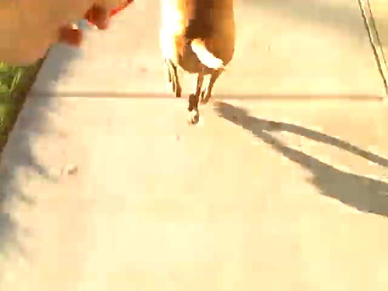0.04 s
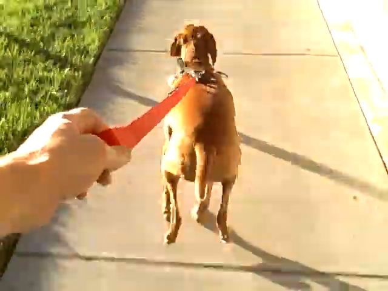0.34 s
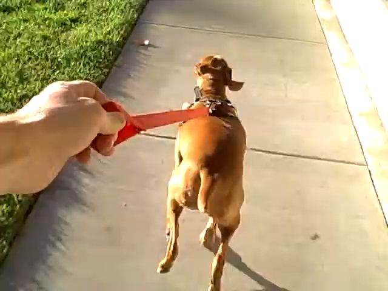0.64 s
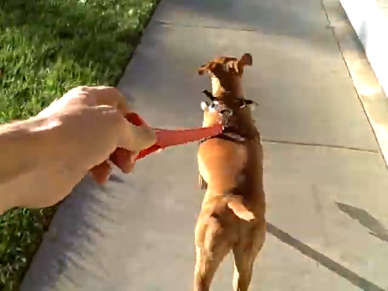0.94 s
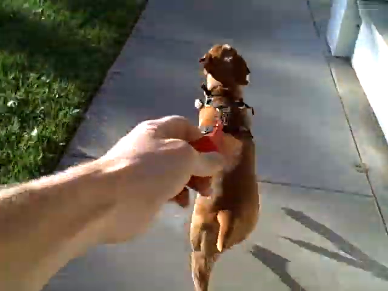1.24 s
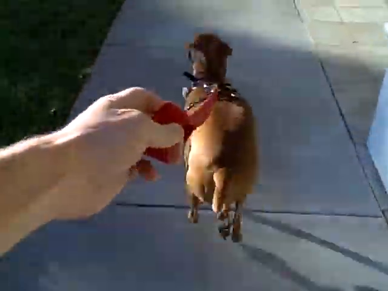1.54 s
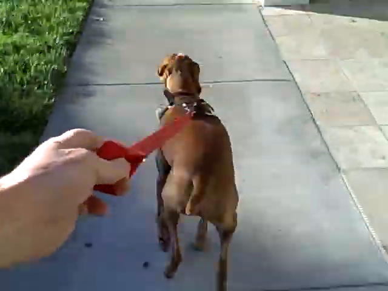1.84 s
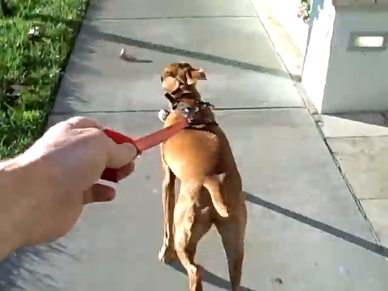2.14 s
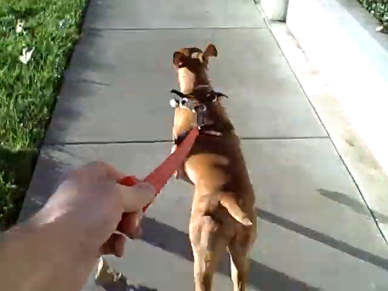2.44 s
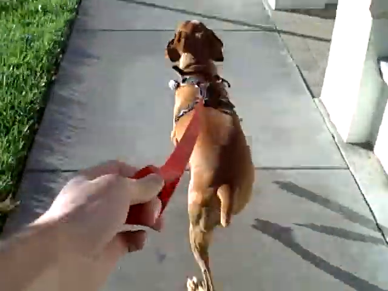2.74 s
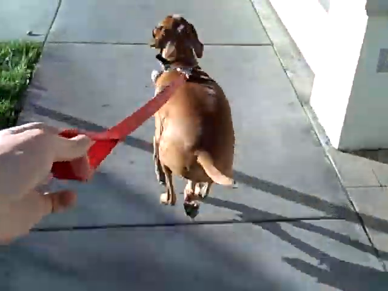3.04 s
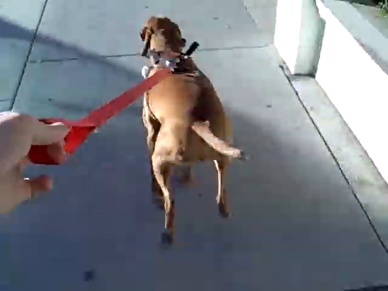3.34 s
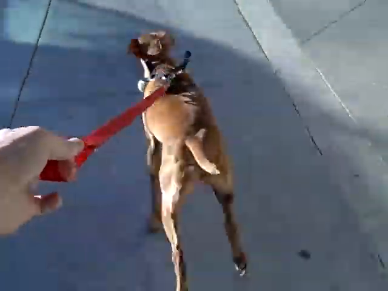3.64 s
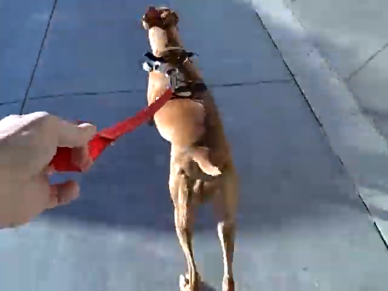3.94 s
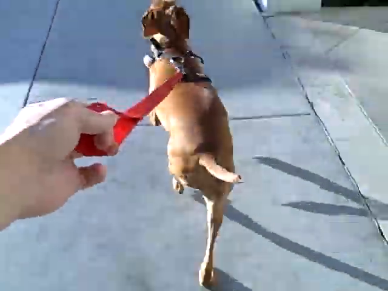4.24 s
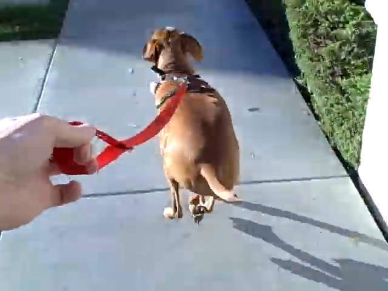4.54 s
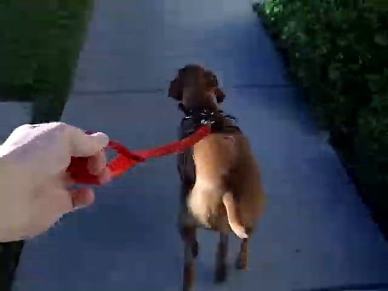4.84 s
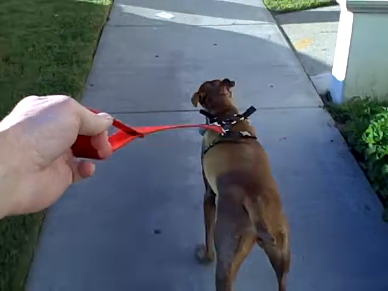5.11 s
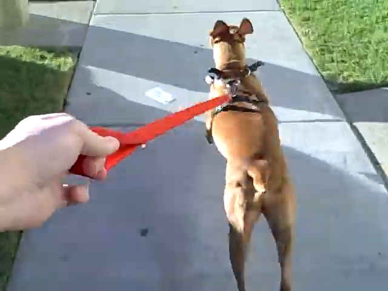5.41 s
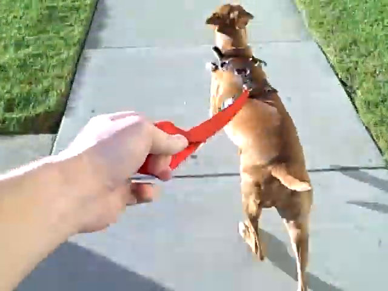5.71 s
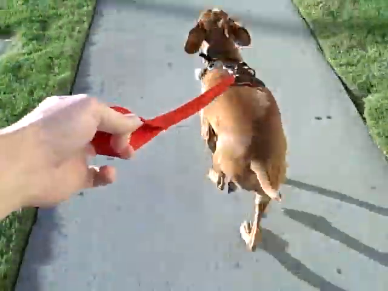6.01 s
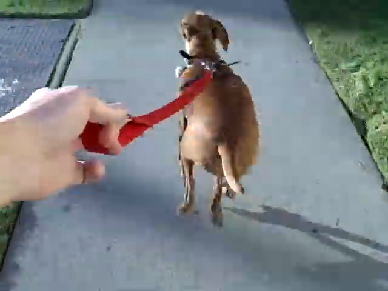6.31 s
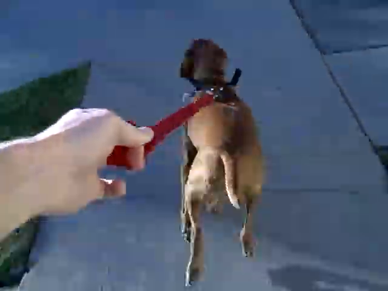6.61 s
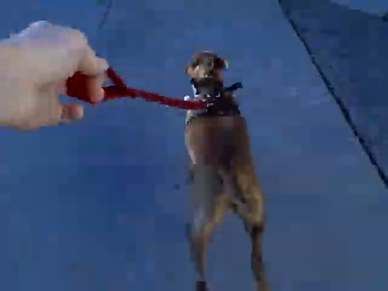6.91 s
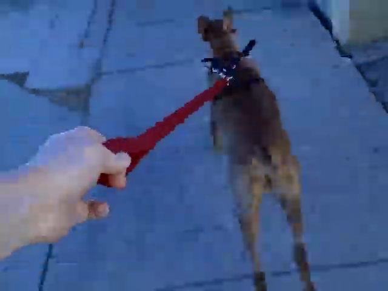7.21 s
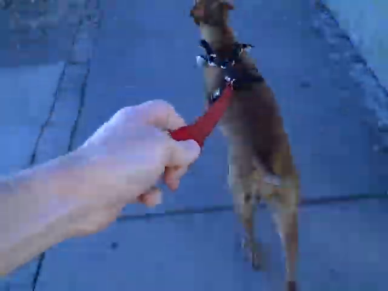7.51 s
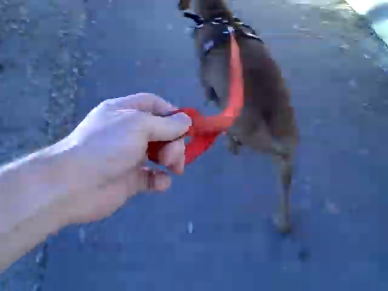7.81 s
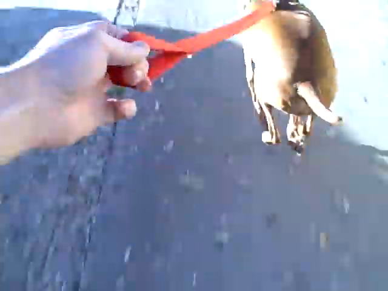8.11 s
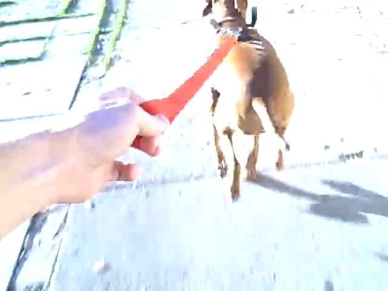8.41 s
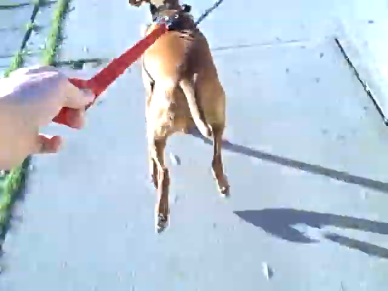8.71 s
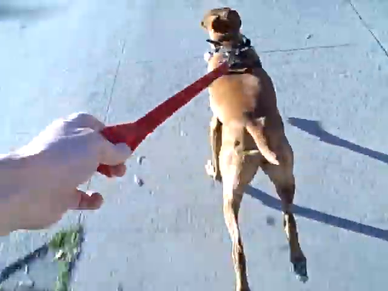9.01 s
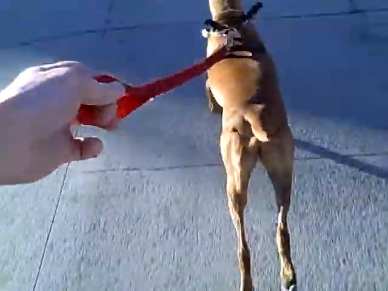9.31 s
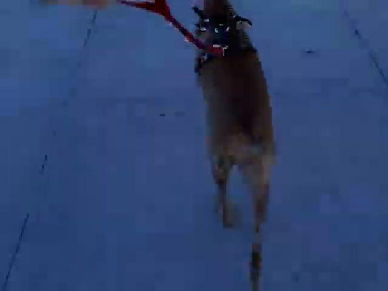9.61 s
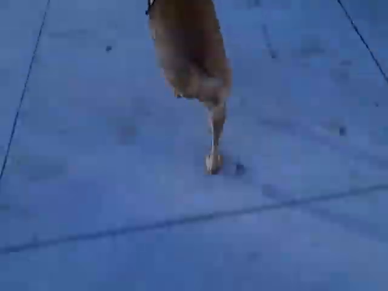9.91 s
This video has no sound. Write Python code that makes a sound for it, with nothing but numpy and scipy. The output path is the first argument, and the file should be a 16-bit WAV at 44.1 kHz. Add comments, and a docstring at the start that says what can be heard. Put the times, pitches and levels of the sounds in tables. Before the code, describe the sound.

A skateboard rolls along a concrete sidewalk, its wheels making quick double clacks over the joints about four times a second. The bearings hiss and wind rumbles on the microphone in the rider's hand. A dog's leash clip ticks now and then. In the second half the paving turns rough, and the wheels roar, snap over stones and knock through cracks before two last joints clack by.

```python
"""A skateboard rolls along a concrete sidewalk behind a dog on a leash, heard from the rider's hand.
From the start, front and rear wheels clack over four slab joints a second, above hissing bearings
and air rumbling on the microphone. From about 3.5 s the dog's harness ticks now and then.
After 6 s the paving turns rough: the wheels roar, jolt through cracks and snap over stones,
and the hardest knocks overload the microphone. Two last joints clack by near the end."""
import sys
import numpy as np
from scipy import signal
from scipy.fft import rfft, irfft, next_fast_len
from scipy.io import wavfile
from scipy.ndimage import map_coordinates

SR = 44100
rng = np.random.default_rng(int(sys.argv[2]) if len(sys.argv) > 2 else 0)


def materialize(psi):
    """Save the field psi as 16-bit PCM at rate SR to the path in sys.argv[1].

    A 1-D psi becomes a single channel; in a 2-D psi each row is a channel.
    """
    bounded = np.clip(np.atleast_2d(psi).T, -1, 1)
    quanta = np.round(bounded * 32767).astype(np.int16)
    wavfile.write(sys.argv[1], SR, quanta)


N = 438794


def amp(db):
    """Decibels to gain."""
    return 10 ** (np.asarray(db) / 20)


def unit(x):
    """Scale to rms 1."""
    return x / np.sqrt(np.mean(x ** 2) + 1e-20)


def automation(points):
    """A line through (time_s, value) points, one value per sample."""
    return np.interp(np.arange(N) / SR, *np.transpose(points))


def wobble(rate_hz):
    """A smooth random curve with rate_hz knots a second."""
    knots = rng.standard_normal(int(N * rate_hz / SR) + 4)
    return map_coordinates(knots, [np.arange(N) * rate_hz / SR])


def filtered(x, response):
    """Zero-phase EQ; response gives the gain at each frequency."""
    size = next_fast_len(N + SR // 4)
    return irfft(rfft(x, size) * response(np.fft.rfftfreq(size, 1 / SR)), size)[:N]


def coloured(x, spectrum):
    """Minimum-phase EQ through (freq_hz, level_db) points, scaled to rms 1."""
    size = 2 ** 12
    hz, db = np.transpose(spectrum)
    gain = amp(np.interp(np.log(np.fft.rfftfreq(size, 1 / SR) + 1), np.log(hz), db))
    cepstrum = irfft(np.log(gain))[:size // 2]
    cepstrum[1:] *= 2
    impulse_response = irfft(np.exp(rfft(cepstrum, size)))
    return unit(signal.fftconvolve(x, impulse_response)[:N])


def noise(spectrum):
    """Coloured noise of rms 1."""
    return coloured(rng.standard_normal(N), spectrum)


def grains(spectrum, rate_hz, spread_db):
    """Tiny coloured impacts of random timing and size, at rms 1."""
    hits = (rng.random(N) < rate_hz / SR) * rng.choice([-1, 1], N)
    sizes = amp(spread_db * np.clip(rng.standard_normal(N), -3, 2.5))
    return coloured(hits * sizes, spectrum)


def add(track, start_s, sound):
    """Mix a sound into a track."""
    part = track[max(round(start_s * SR), 0):][:len(sound)]
    part += sound[:len(part)]


def bursts(starts_s, levels_db, attack_s, t60_s):
    """An envelope that jumps at each start and dies away."""
    t = np.arange(SR // 8) / SR
    envelope = np.zeros(N)
    for start_s, db in zip(starts_s, levels_db):
        add(envelope, start_s, amp(db - 60 * t / t60_s) * (1 - np.exp(-t / attack_s)))
    return envelope


def struck(starts_s, peaks_db, spectrum):
    """One sharp blow at each start, through a body of the given colour."""
    blow = coloured(signal.unit_impulse(SR // 50), spectrum)[:SR // 50]
    track = np.zeros(N)
    for start_s, db in zip(starts_s, peaks_db):
        add(track, start_s, amp(db) * blow / np.abs(blow).max())
    return track


# low rumble of air: freq_hz, level_db
WIND_EQ = [(10, -3), (25, -2.5), (42, -1), (65, -8.5), (110, -14), (200, -20), (500, -60)]


def wind():
    """Moving air rumbles unevenly on the microphone."""
    return amp(-32.5 + 0.83 * wobble(3.3)) * noise(WIND_EQ)


# leash clip cues: start_s, level_db
HARNESS_TICKS = [(3.4857, -26), (3.7665, -25.5), (4.588, -20), (4.9419, -19), (6.378, -26), (7.9137, -22.5),
                 (8.2978, -21)]


def harness():
    """The leash clip ticks against its ring, short and bright."""
    start_s, level_db = np.transpose(HARNESS_TICKS)
    steel_eq = [(1500, -25), (3000, 5), (5000, -7), (6500, 19.5), (8500, -11)]
    return bursts(start_s, level_db + 3, attack_s=0.0001, t60_s=0.011) * noise(steel_eq)


# fader ride of the bearings: time_s, level_db
BEARING_FADER = [(0.0, -43.5), (0.61, -46), (1.6, -45.5), (3.55, -39.5), (3.9, -44), (6.54, -37.5),
                 (8.76, -37.5), (8.95, -44), (9.62, -37.5), (9.95, -42)]
# broad, bright hiss: freq_hz, level_db
HISS_EQ = [(1800, -30.5), (3000, -13.5), (3800, -15.5), (4500, -6.5), (5300, -8.5), (5900, -1), (6300, 2.5),
           (6570, 2), (6850, -2), (7200, -4), (8000, -14.5), (8700, -35.5)]
# narrow whistling ring near 6.6 kHz: freq_hz, level_db
WHISTLE_EQ = [(5600, -30), (6250, -6.5), (6570, 1), (6900, -8), (7600, -30.5)]


def bearings(rough_db, texture):
    """The spinning bearings hiss, shaken by the paving; a narrow whistling ring swells with the hiss."""
    fader_db = automation(BEARING_FADER)
    hiss_db = fader_db + 0.43 + 0.07 * rough_db + 0.49 * texture + 1.7 * wobble(90)
    whistle_db = -47 + 1.4 * (fader_db - fader_db.mean()) + 1.4 * wobble(11)
    hiss = amp(hiss_db) * grains(HISS_EQ, rate_hz=12000, spread_db=7)
    return hiss + amp(whistle_db) * noise(WHISTLE_EQ)


# roughness of the concrete: time_s, level_db
PAVING_ROUGHNESS = [(0.0, -30.5), (0.8, -31.5), (1.08, -33.5), (2.13, -31.5), (2.88, -28), (3.52, -26),
                    (3.88, -33.5), (4.1, -33.5), (4.46, -29), (4.82, -29.5), (4.93, -27), (5.82, -23),
                    (5.99, -28.5), (6.18, -28), (6.43, -25), (6.85, -21), (6.98, -25.5), (7.15, -22),
                    (7.57, -22), (7.9, -26.5), (8.26, -22), (8.42, -20.5), (8.7, -21), (9.03, -26.5),
                    (9.23, -25.5), (9.59, -20), (9.73, -23), (9.95, -24)]
# low boom of the tail: freq_hz, level_db
BOOM_EQ = [(60, -20), (130, -12.5), (250, -4.5), (310, -4), (360, 2.5), (430, 1), (520, -3), (800, -44.5)]
# hollow roar of the deck: freq_hz, level_db
DECK_EQ = [(250, -30), (400, -12), (480, -2.5), (620, 3.5), (730, -1), (850, -10.5), (1000, -16.5),
           (1200, -21.5), (1500, -34.5), (3000, -65.5)]
# midrange crunch of grit: freq_hz, level_db
GRIT_EQ = [(700, -16), (1150, 8), (1430, -0.5), (1750, 6.5), (2000, -1), (2250, 1.5), (2600, -6.5),
           (3500, -8), (5000, -25)]


def rolling():
    """The grain of the concrete drums on the wheels and shakes deck, trucks and bearings."""
    usual_paving_db = -26.5
    rough_db = automation(PAVING_ROUGHNESS) - usual_paving_db
    texture = wobble(35)  # rougher and smoother patches pass under the wheels
    boom_db = -31.5 + 1.18 * rough_db + 2.2 * texture
    roar_db = -27 + 0.96 * rough_db + 1.72 * texture
    grit_db = -41 + 0.65 * rough_db
    boom = amp(boom_db) * grains(BOOM_EQ, rate_hz=1500, spread_db=4)
    roar = amp(roar_db) * grains(DECK_EQ, rate_hz=2500, spread_db=3.5)
    grit = amp(grit_db - 1.7 + 2.2 * texture) * grains(GRIT_EQ, rate_hz=3400, spread_db=3.5)
    pebbles = amp(grit_db - 11) * grains(GRIT_EQ, rate_hz=120, spread_db=9.5)
    return boom + roar + grit + pebbles + bearings(rough_db, texture)


# crumbled patches: start_s, length_s, roar_db, grit_db
CRUMBLED_PATCHES = [(2.677, 0.033, -27, -32.5), (3.506, .19, -25, -45), (6.489, .022, -15, -37),
                    (6.87, 0.037, -18, -38), (7.396, 0.025, -15.5, -31), (7.453, 0.11, -19, -34.5),
                    (7.578, 0.12, -40, -35), (7.719, 0.0267, -11.5, -23), (7.736, 0.047, -34, -32),
                    (8.258, 0.012, -20, -31), (8.681, 0.199, -17, -33)]


def scrunches():
    """Crumbled concrete gives a short, dense volley of tiny blows."""
    roar_swell, grit_swell = np.zeros((2, N))
    for start_s, length_s, roar_db, grit_db in CRUMBLED_PATCHES:
        fade = signal.windows.tukey(int(length_s * SR))
        add(roar_swell, start_s, amp(roar_db) * fade)
        add(grit_swell, start_s, amp(grit_db) * fade)
    roar, grit, hiss = [grains(eq, rate_hz=5000, spread_db=4) for eq in (DECK_EQ, GRIT_EQ, HISS_EQ)]
    return roar_swell * roar + grit_swell * (grit + hiss)


# stones under a wheel: start_s, level_db
STONE_SNAPS = [(6.5582, -18.5), (6.6752, -24), (6.7386, -17.5), (7.643, -16), (7.839, -30), (8.2053, -20.5),
               (8.328, -20), (8.6388, -21)]


def stones():
    """A loose stone snaps under a wheel and knocks the deck."""
    start_s, level_db = np.transpose(STONE_SNAPS)
    return struck(start_s, level_db, GRIT_EQ) + struck(start_s, level_db + 2, DECK_EQ)


def deck_thuds(starts_s, levels_db, modes, attack_s, detune):
    """Each blow kicks the deck; the rider's shifting weight changes its modes a little."""
    t = np.arange(SR // 10) / SR
    pitch_hz, mode_db, t60_s = np.transpose(modes)[:, :, None]
    track = np.zeros(N)
    for start_s, db in zip(starts_s, levels_db):
        pitch_jitter, level_jitter = rng.standard_normal((2, len(modes), 1))
        decay = amp(mode_db + 3.5 * level_jitter - 60 * t / t60_s)
        partials = decay * np.sin(2 * np.pi * pitch_hz * (1 + detune * pitch_jitter) * t)
        thud = partials.sum(axis=0) * (1 - np.exp(-t / attack_s))
        add(track, start_s, amp(db) * unit(thud))
    return track


# deck modes, struck at the nose: pitch_hz, level_db, t60_s
NOSE_MODES = [(204, -16, 0.095), (370, -17.5, 0.019), (474, -0.5, 0.043), (607.4, 10.5, 0.033),
              (715, -8, 0.044), (930, -13, 0.039)]
# clack of the front truck: freq_hz, level_db
FRONT_EQ = [(700, -1), (1100, 7.5), (1500, -9), (1950, -7), (2550, -5), (3500, -16), (5000, -33.5)]
# loose washers and bearing shields on both trucks: freq_hz, level_db
RATTLE_EQ = [(2000, -30), (3000, -12), (3800, -9), (4450, -3.5), (5100, -6.5), (6200, 2.5), (6700, -0.5),
             (7400, -7.5), (8700, -33)]


def front_truck(start_s, blow_db, edge_db):
    """The lightly loaded front truck chatters on after each blow, and its hanger rings."""
    clack_db = blow_db + edge_db
    thud = deck_thuds(start_s, blow_db - 10.5, NOSE_MODES, attack_s=0.00069, detune=0.041)
    clack = struck(start_s, clack_db - 3.5, FRONT_EQ)
    chatter = bursts(start_s, clack_db - 5, attack_s=0.0006, t60_s=0.04) * noise(FRONT_EQ)
    hanger_eq = [(1700, -35), (2040, -12.5), (2150, 5.5), (2320, 3.5), (2450, -6), (2900, -29)]
    ring = bursts(start_s, blow_db - 0.5, attack_s=0.0066, t60_s=0.034) * noise(hanger_eq)
    shake = bursts(start_s, clack_db - 11.5, attack_s=0.00048, t60_s=0.064)
    rattle = shake * grains(RATTLE_EQ, rate_hz=2500, spread_db=0.5)
    return thud + clack + chatter + ring + rattle


# deck modes, struck at the tail: pitch_hz, level_db, t60_s
TAIL_MODES = [(236, -21, 0.056), (360, -7, 0.022), (456, -5.5, 0.024), (655, 2, 0.02), (740, -8, 0.01),
              (1143, -24.5, 0.017)]
# clack of the rear truck: freq_hz, level_db
REAR_EQ = [(700, -31), (1100, 4), (1450, -3.5), (1800, -1), (2300, -10), (3400, -15.5), (5000, -34)]


def rear_truck(start_s, blow_db, edge_db):
    """The rear truck carries the weight: the deck knocks, with one hard clack just after."""
    clack_db = blow_db + edge_db
    clack_delay_s = 0.00082
    clack_s = start_s + clack_delay_s
    thud = deck_thuds(start_s, blow_db - 10.5, TAIL_MODES, attack_s=0.00064, detune=0.048)
    clack = struck(clack_s, clack_db - 5.5, REAR_EQ)
    chatter = bursts(clack_s, clack_db - 7, attack_s=0.00015, t60_s=0.023) * noise(REAR_EQ)
    shake = bursts(start_s, clack_db - 18, attack_s=0.00033, t60_s=0.063)
    rattle = shake * grains(RATTLE_EQ, rate_hz=2500, spread_db=-1)
    return thud + clack + chatter + rattle


# slab joints, where a sharper edge adds clack: start_s, front_db, rear_db, edge_db
SLAB_JOINTS = [(0.079, -12.5, -13.5, 6), (.335, -14.5, -13, 4), (.587, -12.5, -9.5, 3),
               (.841, -13, -13.5, 1), (1.082, -15, -9.5, 0.5), (1.333, -12.5, -12.5, 3),
               (1.583, -18.5, -13.5, 5.5), (1.83, -16, -14.5, 0), (2.077, -16, -11, 1.5),
               (2.327, -18.5, -16, 1.5), (2.573, -12, -8, -3), (2.819, -14.5, -14, 4.5),
               (3.066, -16.5, -11, -0.5), (3.308, -14.5, -13, 4.5), (3.546, -7.5, -8.5, 2),
               (3.808, -15.5, -17, 6), (4.059, -14, -14, 5), (4.306, -11, -7, -3), (4.554, -13.5, -11, -1),
               (4.803, -18, -8.5, -1.5), (5.052, -17.5, -14.5, -0.5), (5.283, -11.5, -9, -1),
               (5.513, -8, -14.5, -1), (5.744, -13.5, -14.5, 3), (5.971, -15.5, -14.5, 7),
               (6.15, -21, -16, 2), (8.837, -8.5, -5, 2.5), (9.703, -14.5, -10.5, 3)]
# lone cracks and pits in the rough paving: start_s, blow_db, edge_db
LONE_CRACKS = [(6.386, -14, -11.5), (6.933, -15, -1.5), (7.464, -10.5, -1), (7.683, -1.5, -0.5),
               (7.798, -6.5, -1.5), (7.977, -14, -1), (8.057, -18, -2), (8.148, -18, -7), (8.457, -21.5, 5),
               (8.523, -18, 1.5), (9.054, -22, 6), (9.108, -18.5, 0), (9.271, -20, 0), (9.444, -18, 3)]
# rising speed, which tightens the double clack: time_s, speed_m_per_s
BOARD_SPEED = [(0, 4.7), (.85, 4.99), (3.4, 5.06), (3.85, 5.33), (9.95, 5.75)]


def wheel_hits():
    """Each joint hits the front wheels, then the rear; the lone cracks all sound through the rear truck."""
    wheelbase_m = 0.36
    start_s, front_db, rear_db, edge_db = np.transpose(SLAB_JOINTS)
    lag_s = wheelbase_m / np.interp(start_s, *np.transpose(BOARD_SPEED))
    rear_hits = np.hstack([[start_s + lag_s, rear_db, edge_db], np.transpose(LONE_CRACKS)])
    return front_truck(start_s, front_db, edge_db) + rear_truck(*rear_hits)


def scene():
    """Board, harness and air in one mono mix."""
    board = rolling() + scrunches() + stones() + wheel_hits()
    return (board + harness() + wind())[None]


def record(dry):
    """A narrow-band microphone path: steep low-pass, soft clip, then a shelf to tame the fizz."""
    cutoff_hz, ceiling, top_hz = 8750, 0.72, 16000
    narrow = filtered(dry[0], lambda hz: 1 / np.sqrt(1 + (hz / cutoff_hz) ** 110))
    clipped = narrow / (1 + np.abs(narrow / ceiling) ** 12) ** (1 / 12)
    return filtered(clipped, lambda hz: amp(np.interp(hz, [8500, 9300], [0, -8])) * (hz < top_hz))[None]


dry = scene()
out = record(dry)
materialize(out)
```